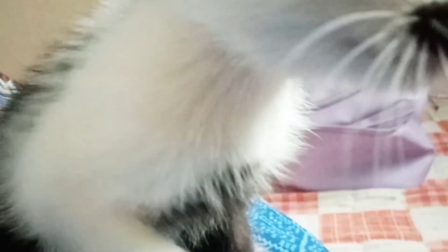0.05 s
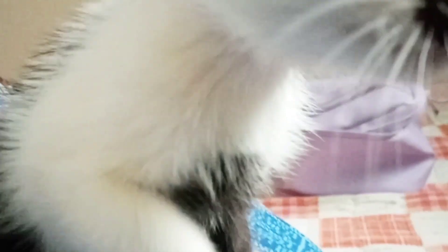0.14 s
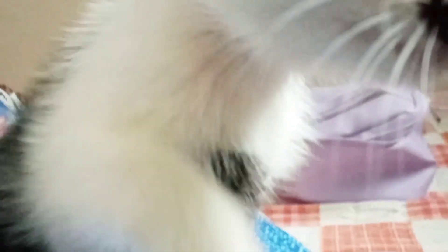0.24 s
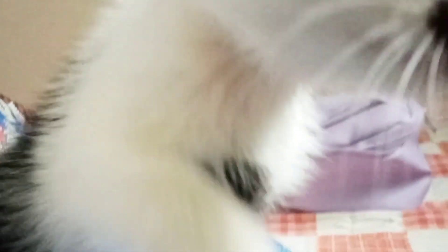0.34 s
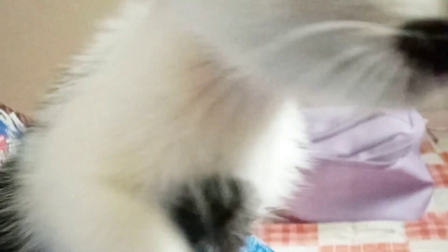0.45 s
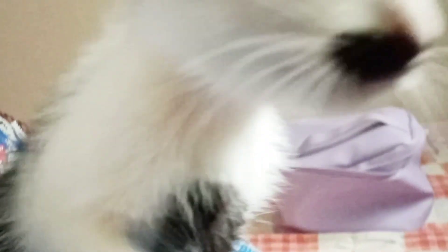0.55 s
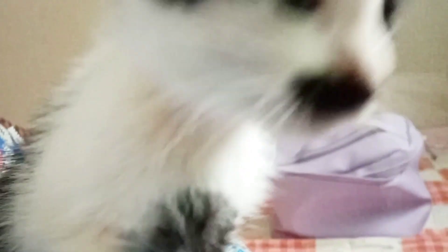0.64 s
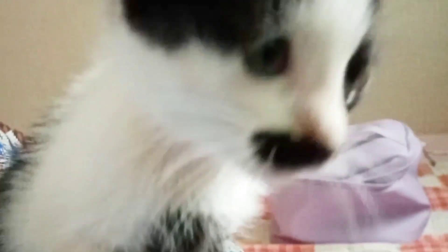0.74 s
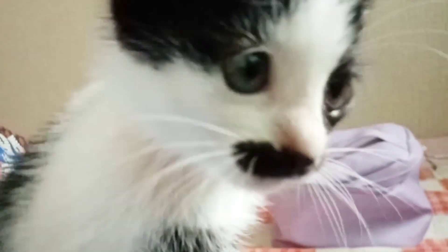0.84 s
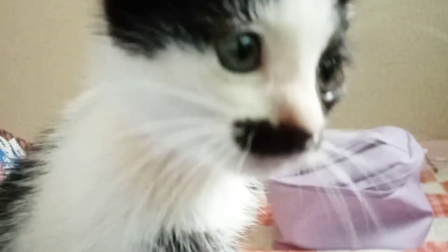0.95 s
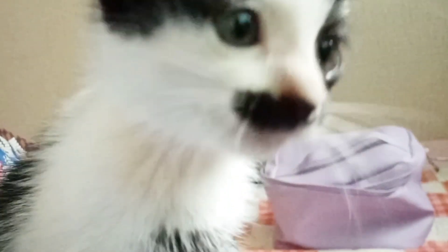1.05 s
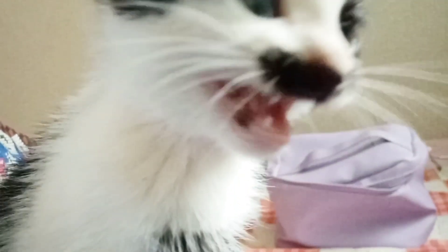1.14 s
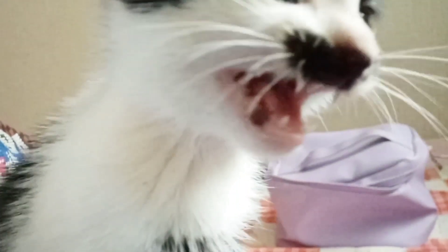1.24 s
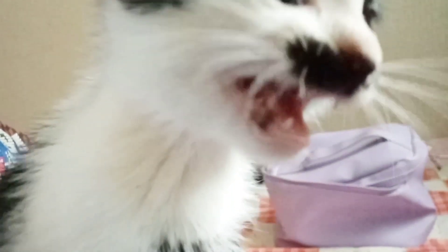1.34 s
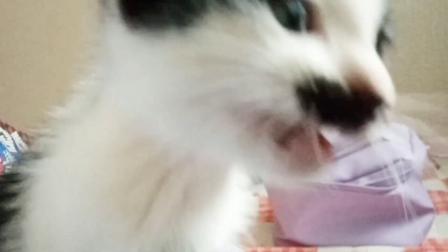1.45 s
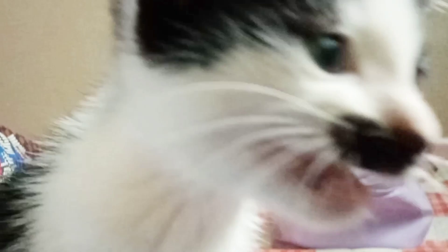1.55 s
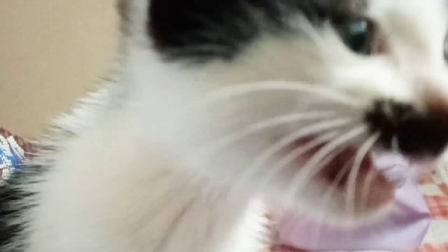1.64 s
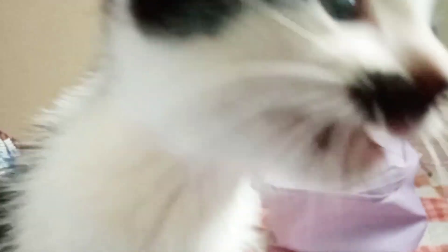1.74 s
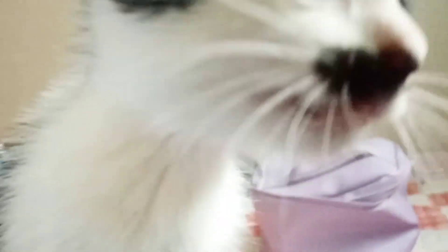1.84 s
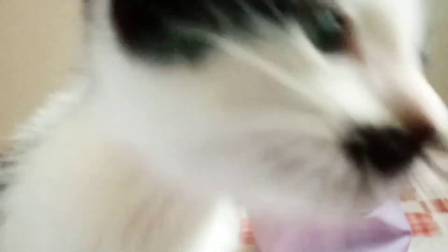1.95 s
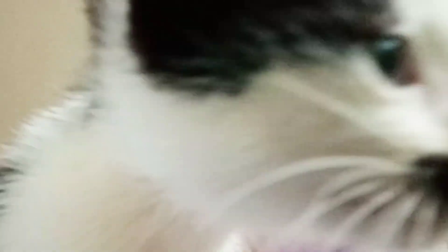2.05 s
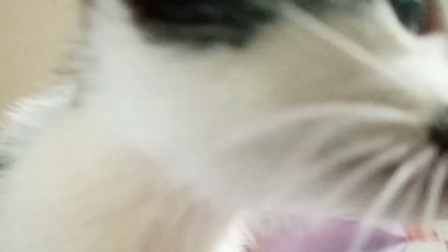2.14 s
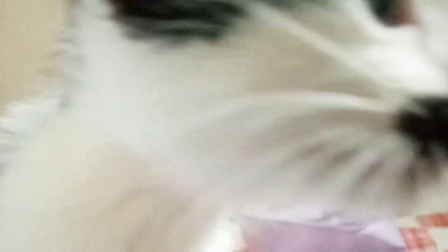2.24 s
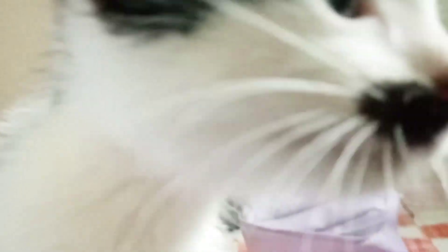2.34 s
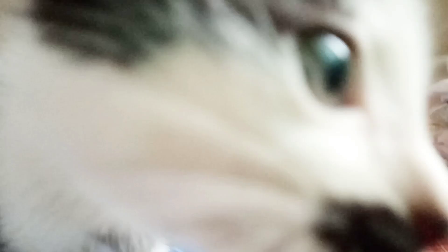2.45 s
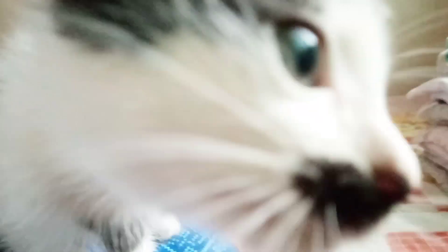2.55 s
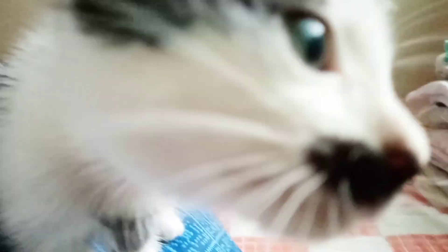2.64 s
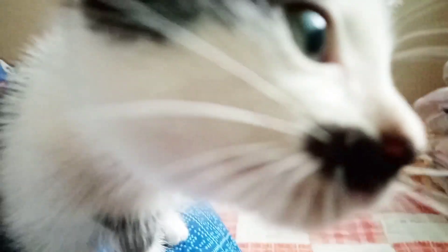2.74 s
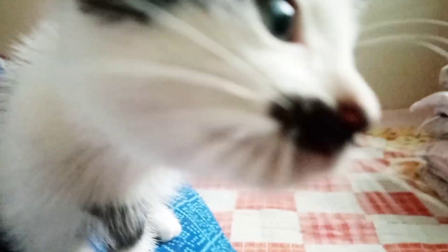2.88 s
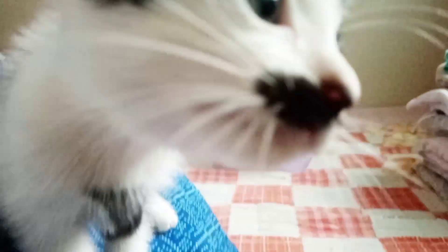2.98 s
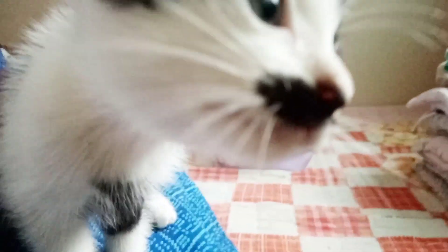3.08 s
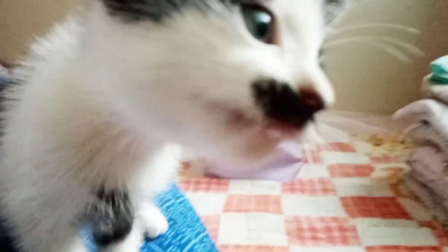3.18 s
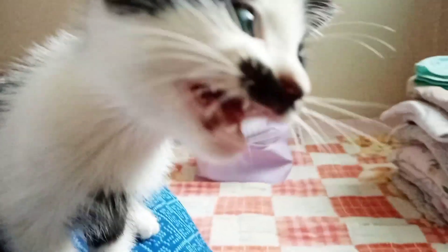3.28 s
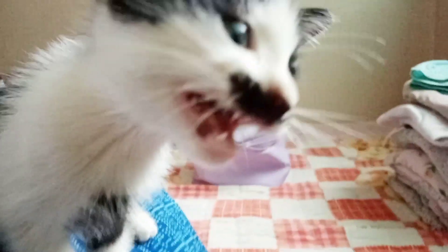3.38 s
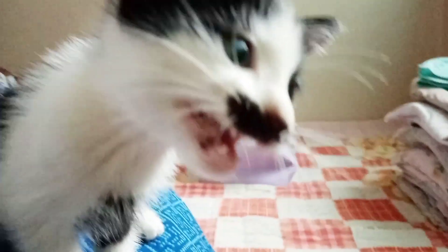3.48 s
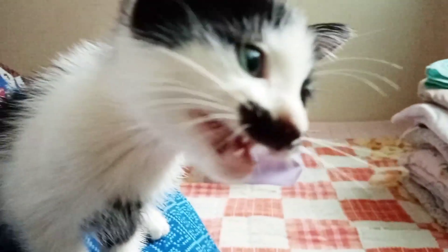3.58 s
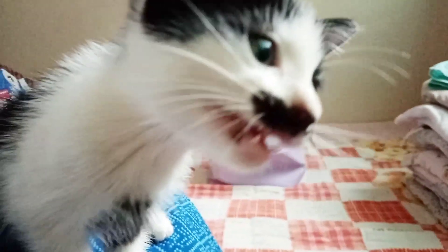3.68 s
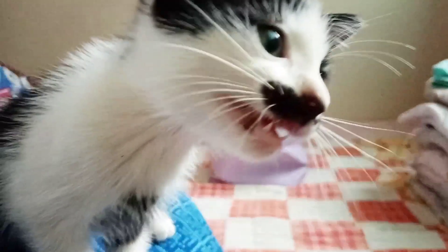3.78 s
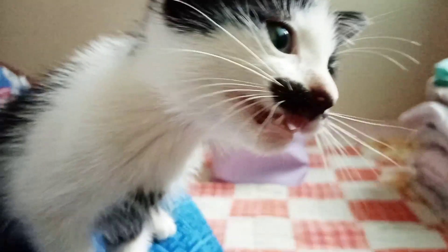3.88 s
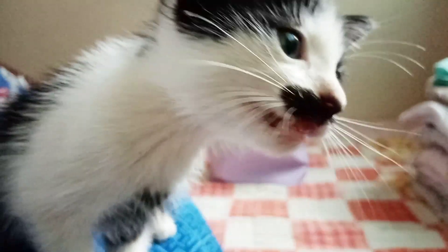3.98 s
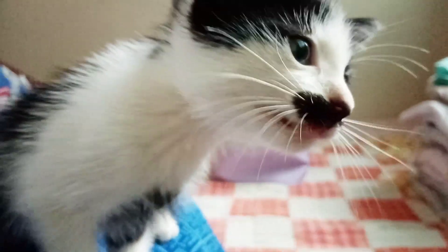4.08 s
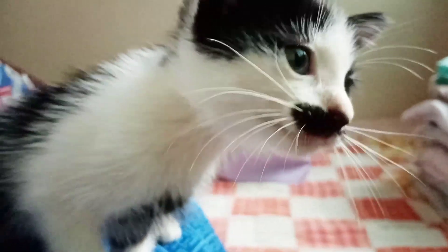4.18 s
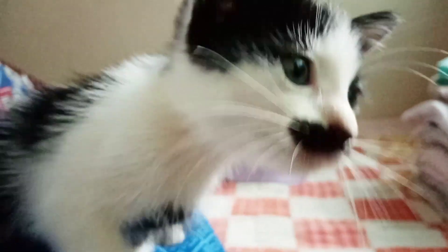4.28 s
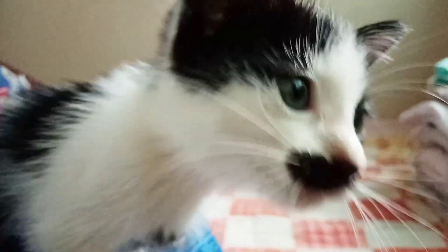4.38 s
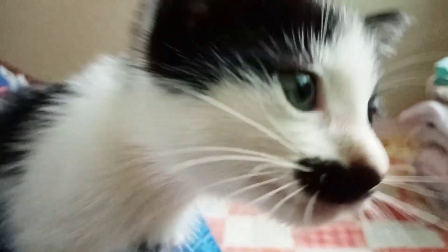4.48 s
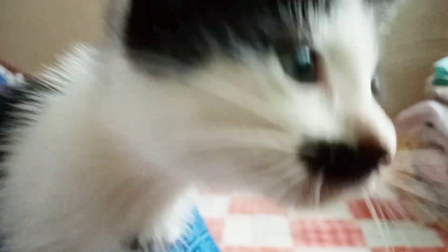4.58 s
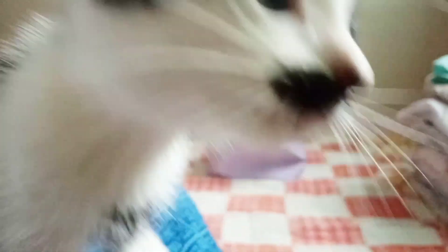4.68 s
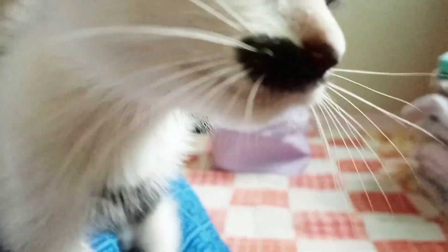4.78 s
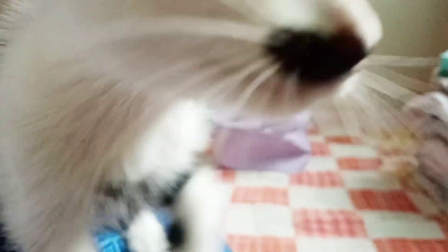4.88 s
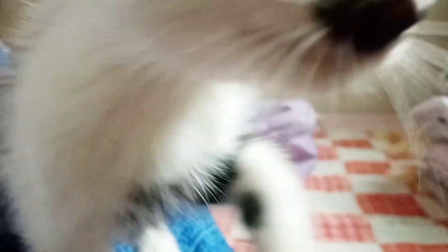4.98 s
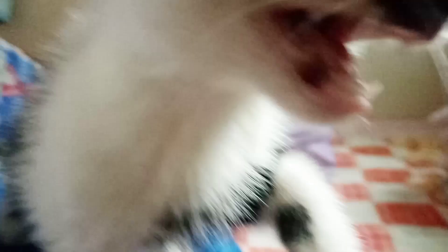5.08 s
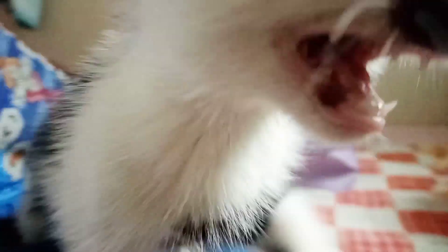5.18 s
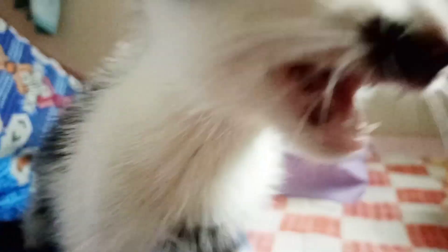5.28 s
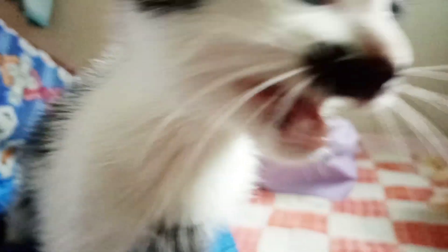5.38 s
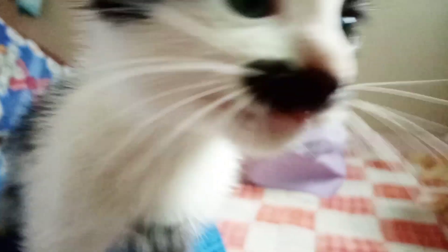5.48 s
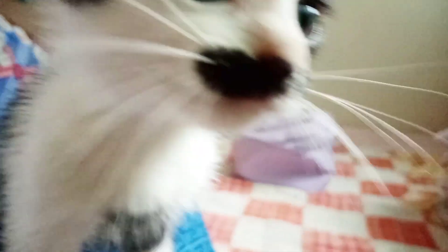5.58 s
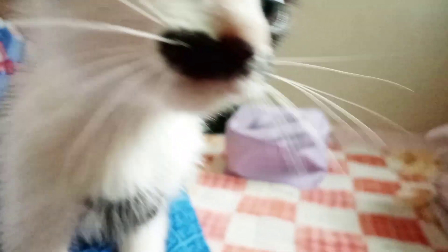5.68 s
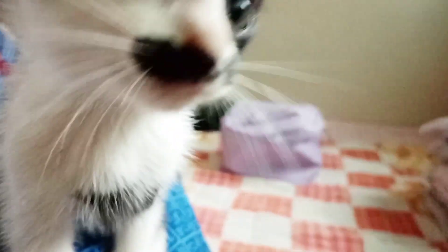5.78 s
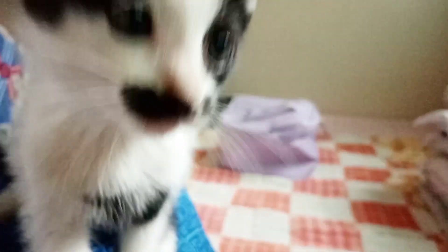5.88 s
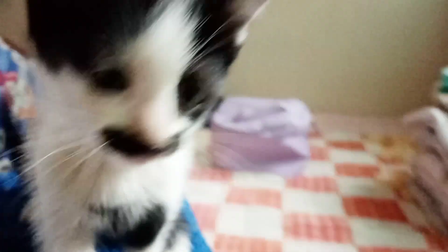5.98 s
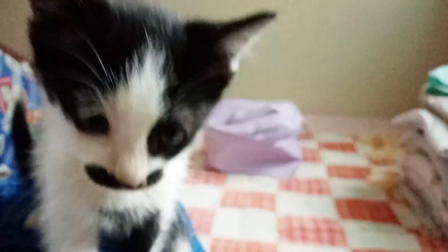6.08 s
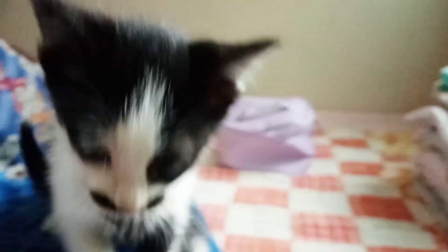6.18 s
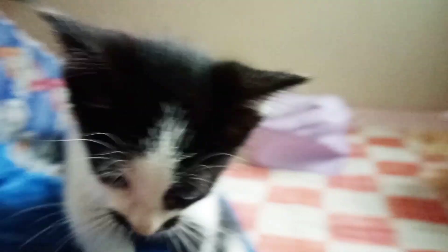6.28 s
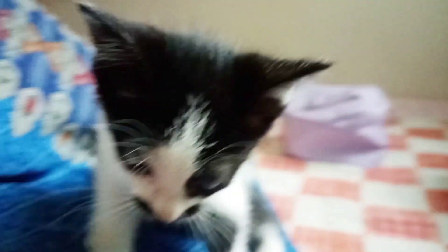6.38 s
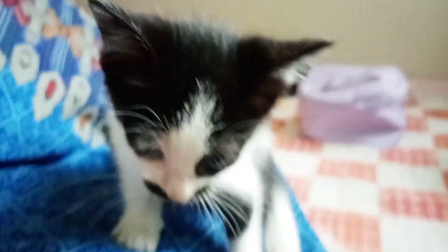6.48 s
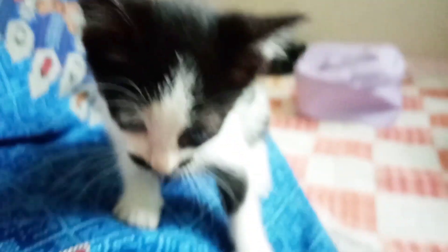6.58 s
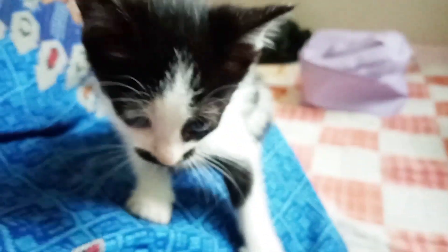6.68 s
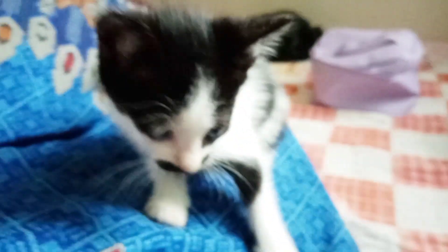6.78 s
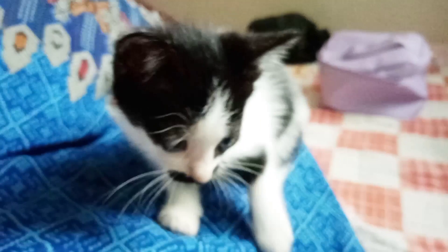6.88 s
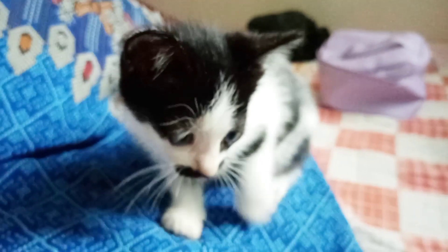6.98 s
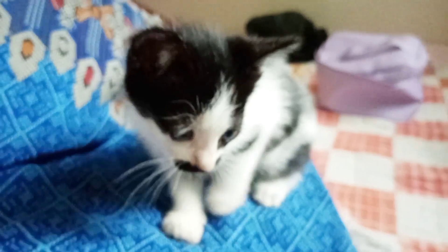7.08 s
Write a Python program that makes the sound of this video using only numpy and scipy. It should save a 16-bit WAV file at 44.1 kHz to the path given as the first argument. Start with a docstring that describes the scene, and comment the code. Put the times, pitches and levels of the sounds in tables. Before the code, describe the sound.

A small quiet room, heard through a close handheld stereo microphone: low fluttering rumble, a faint wavering drone near 117 Hz, room air and thin hiss that swells now and then. At 1.0 s a young kitten meows very close, pitch leaping to around 830 Hz as the mouth opens, bright and nasal, then sagging until 1.9 s and ending in a short puff of hiss. Around 2.4 s come a faint tick and a soft dull bump, with brief swells of hiss to about 3.1 s. The second meow, 3.2 to 4.1 s, is lower, near 700 Hz, smooth, fading gradually to a puff. The third, 5.0 to 5.5 s, is short, rougher and airier, jumping to about 820 Hz and dropping quickly. Reflections are short and soft. From 5.6 to 6.8 s, five faint distant chirps fall near 2.3 kHz, with soft bumps around 6.0 s; room tone continues to about 7.1 s.

```python
"""A low wavering drone (sines), rumble, room air and thin hiss (coloured noise) fill a small quiet room.
From 1 s a kitten meows three times right in front of a hand-held camera: harmonics through a moving throat.
Each cry starts with a short soft noise, leaps up in pitch, sags and ends in a short puff of hiss (noise bursts).
Faint ticks and soft bumps (short noise) come in between; faint falling chirps (swept sines) follow."""
import sys
import numpy as np
from scipy import signal
from scipy.fft import rfft, irfft, next_fast_len
from scipy.io import wavfile
from scipy.ndimage import uniform_filter1d

SR = 44100
rng = np.random.default_rng(int(sys.argv[2]) if len(sys.argv) > 2 else 0)


def wav_record(signal):
    """Record a signal, one row per channel, as 16-bit PCM in the file named by sys.argv[1]."""
    frames = np.transpose(np.atleast_2d(signal))
    bounded = np.clip(frames, -1, 1)
    # unit amplitude maps onto the largest positive 16-bit level
    quanta = np.round(bounded * 32767).astype(np.int16)
    wavfile.write(sys.argv[1], SR, quanta)


N = 314442
TIME = np.arange(N) / SR
EDGE_HZ = 15600  # top of the band


def gain_of(db):
    """Decibels to amplitude."""
    return 10 ** (np.asarray(db) / 20)


def evened(x):
    """Scales to an rms of one."""
    return x / np.sqrt(np.mean(x ** 2) + 1e-20)


def read(points, hz):
    """Reads a table along a log-frequency axis."""
    f, value = np.transpose(points)
    return np.interp(np.log(hz + 1), np.log(f + 1), value)


def add(mix, s, sound):
    """Mixes a two-channel sound in at time s."""
    part = mix[:, max(round(s * SR), 0):][:, :sound.shape[1]]
    part += sound[:, :part.shape[1]]


def wander(size, rate_hz):
    """Random drift of rms one, rolling off above the rate."""
    hz = np.fft.rfftfreq(size, 1 / SR)
    spectrum = rfft(rng.standard_normal(size)) * (hz > 0) / (1 + (hz / rate_hz) ** 2)
    return evened(irfft(spectrum, size))


def bump(hz, centre_hz, half_width_hz):
    """Bell-shaped curve of a resonance."""
    return 1 / (1 + ((hz - centre_hz) / half_width_hz) ** 2)


def shelf(hz, corner_hz, order=8):
    """Rises from zero to one around the corner."""
    return 1 / (1 + (corner_hz / hz) ** order)


# left-right likeness of noise: (frequency [Hz], correlation [-1 to 1])
LIKENESS = [(60, 1), (130, 0.92), (290, 0.83), (640, 0.62), (1410, -0.25), (3100, 0.21), (6820, -0.069),
            (15000, -0.072)]


def noise(size, shape):
    """Two-channel noise with the spectrum shape(hz), alike in the bass and nearly unrelated in the treble."""
    padded = next_fast_len(size)
    hz = np.fft.rfftfreq(padded, 1 / SR)
    a, b = rfft(rng.standard_normal((2, padded)))
    same = np.clip(read(LIKENESS, hz), -1, 1)
    pair = np.array([a, same * a + np.sqrt(1 - same ** 2) * b])
    return evened(irfft(pair * shape(hz), padded)[:, :size])


# rumble before the gains in rumble(): (time [s], bass level [dB], body level [dB])
RUMBLE = [(0, -53.5, -52.5), (.7, -54.5, -50), (1.25, -51, -52.5), (1.65, -47.5, -51.5), (2.4, -49, -58),
          (2.43, -54, -65), (2.65, -51.5, -60), (3.05, -56.5, -61.5), (3.6, -57, -59), (4.0, -54, -61.5),
          (4.4, -54.5, -63.5), (7.13, -56, -64)]
# brief surges: (start [s], length [s], bass lift [dB], body lift [dB])
SURGES = [(3.166, 0.3, 5, 0.5), (4.986, 0.52, 3, 5)]


def rumble_levels():
    """Bass and body levels in dB: a slow drift with brief surges."""
    s, bass, body = np.transpose(RUMBLE)
    bass, body = np.interp(TIME, s, bass), np.interp(TIME, s, body)
    for start, length_s, bass_db, body_db in SURGES:
        surge = uniform_filter1d(1. * (TIME > start) * (TIME < start + length_s), size=4000)
        bass, body = bass + bass_db * surge, body + body_db * surge
    return bass, body


# rumble spectra: (frequency [Hz], relative level [dB])
BASS_COLOUR = [(20, -38), (45, -39), (62, -14.5), (85, -5.5), (108, 9), (124, 1), (141, -2.5), (170, 3),
               (230, -25.5), (400, -14.5), (700, -71)]
BODY_COLOUR = [(20, -44), (35, -26), (55, -3.5), (120, -4), (220, -3), (280, -1.5), (390, -4), (520, -7.5),
               (700, -5.5), (1000, -11), (1470, -25), (2500, -25), (3400, -76)]


def rumble(bass, body, bass_db=0., body_db=4.5):
    """Two bands of low noise; the level of the body flutters."""
    body_flutter_db = 1.25 * wander(next_fast_len(N), 7.8)[:N]
    low = noise(N, lambda hz: gain_of(read(BASS_COLOUR, hz))) * gain_of(bass_db + bass)
    high = noise(N, lambda hz: gain_of(read(BODY_COLOUR, hz)))
    return low + high * gain_of(body_db + body + body_flutter_db)


# sines of the drone before the throb: (frequency [Hz], level [dB])
DRONE = [(58.5, -76), (117.5, -56.5), (350, -71)]


def drone(bass, waver=0.01297):
    """Sines of wavering pitch that throb, and swell with the bass of the rumble."""
    speed = 1 + waver * wander(next_fast_len(N), 2.84)[:N]
    throb_db = 2.0 * wander(next_fast_len(N), 2.2)[:N] + 1.14 * (bass - bass.mean())
    out = np.zeros(N)
    for hz, db in DRONE:
        out += np.sqrt(2) * gain_of(db + throb_db) * np.sin(2 * np.pi * np.cumsum(hz * speed) / SR)
    return out


# room air spectrum: (frequency [Hz], relative level [dB])
AIR_COLOUR = [(290, -4), (500, 1), (594, -26), (769, 2), (851, -14.5), (927, 0.5), (1070, -9), (1240, -1.5),
              (1670, -5.5), (2070, -4.5), (3960, -33.5), (7560, -37), (8720, -49), (10700, -52),
              (15500, -35)]


def room_air(level_db=-60):
    """Steady coloured noise."""
    return gain_of(level_db) * noise(N, lambda hz: gain_of(read(AIR_COLOUR, hz)))


# swells before the gain in hiss(): (time [s], level [dB], rise time [s], time from start to fade [s])
HISS = [(0, -73.5, 0.018, 1), (1.1, -78.5, .2, 1.3), (2.415, -69.5, 0.019, 0.1),
        (2.766, -70.5, 0.053, 0.27), (3.02, -65, 0.015, 0.092), (3.5, -82, .2, 1.5),
        (4.894, -70.5, 0.029, 0.44), (6.855, -77.5, 0.078, 0.14)]
HISS_FLOOR_DB, HISS_FADE_DB_PER_S = -82.5, 49  # floor before the same gain


def hiss_level():
    """Each swell rises, holds and fades back into a steady floor; powers add."""
    power = gain_of(HISS_FLOOR_DB) ** 2
    for s, db, rise_s, length_s in HISS:
        age = TIME - s
        fading_db = db - HISS_FADE_DB_PER_S * np.maximum(age - length_s, 0)
        power = power + (np.clip(age / rise_s, 0, 1) * gain_of(fading_db)) ** 2
    return np.sqrt(power)


# hiss spectrum on the left: (frequency [Hz], relative level [dB])
HISS_COLOUR = [(1760, 2), (3000, -7.5), (3390, -0.5), (4500, -7), (6390, -7), (7590, -5), (8580, 7.5),
               (9800, 3.5), (11300, -9), (13200, -13), (14900, -5), (15500, -6)]
# (frequency [Hz], left minus right [dB])
HISS_BALANCE = [(6000, 5), (8500, 19.5), (10000, 15), (13500, 3)]


def hiss(gain_db=2.5):
    """Thin swelling noise that leans left."""
    def shape(hz):
        return gain_of(read(HISS_COLOUR, hz) - np.outer([0, 1], read(HISS_BALANCE, hz)))
    return noise(N, shape) * gain_of(gain_db) * hiss_level()


def background():
    """Rumble, drone, room air and hiss together."""
    bass, body = rumble_levels()
    return rumble(bass, body) + drone(bass) + room_air() + hiss()


# jaw gapes: (time [s], half length [s], mouth resonance lift [Hz], treble lift [dB], edge lift [dB],
# fundamental loss [dB])
GAPES = [(1.2, 0.099, 495, 5.5, 0, 1.5), (1.615, 0.049, 4, 0.5, 0.5, -2.5),
         (3.346, 0.074, 560, 4.5, 1, -0.5), (3.681, 0.075, 97, 3.5, -3, 0),
         (5.14, 0.065, 1400, 0.5, 1.5, 1)]
ATTACK_S, RELEASE_S, RELEASE_DB = 0.062, 0.03, 7
SHUT_DB, SEALED_DB, SAG_DB_PER_OCTAVE = 19, 6, 13  # treble losses; sealed: further, before the lips part
MOUTH_HZ, MOUTH_SHUT_HZ, MOUTH_SAG_HZ_PER_OCTAVE = 4336, 800, 930
WEAK_BELOW_HZ = 636  # the fundamental thins out at low pitch
HUM_DB = 2  # a shut mouth hums on the fundamental
PUSH_LEAD_S, PUSH_S, PUSH_EDGE_SHARE = 0.08, 0.092, 0.22  # a push just before the fade sharpens the edge


def cry(t, pitch, level_db, attack_db, open_s, hold_s, push_db, fade_db_per_s, fundamental_db, weak_db,
        bright_db, edge_db, dull_db_per_s, notch_db, notch_octaves):
    """Effort and jaw through one cry; the jaw and the sag of the pitch set the colour of the voice."""
    age = t - t[0]
    effort = level_db - attack_db * np.maximum(1 - age / ATTACK_S, 0)
    effort = effort - fade_db_per_s * np.maximum(age - hold_s, 0)
    effort = effort - RELEASE_DB * np.maximum(1 - (t[-1] - t) / RELEASE_S, 0)
    push = push_db * np.exp(-((age - hold_s + PUSH_LEAD_S) / PUSH_S) ** 2)

    shut = np.cos(np.pi / 2 * np.minimum(age / open_s, 1)) ** 2
    gape_hz, gape_bright, gape_edge, gape_thin = sum(
        np.outer(lifts, np.exp(-((t - s) / half_s) ** 2)) for s, half_s, *lifts in GAPES)
    sag = np.log2(pitch.max() / pitch)

    weak = weak_db * (1 - shelf(pitch, WEAK_BELOW_HZ, order=24)) * (1 - shut)
    fundamental = fundamental_db - weak + HUM_DB * shut - gape_thin
    bright = bright_db - SHUT_DB * shut - SEALED_DB * shut ** 4 + gape_bright - SAG_DB_PER_OCTAVE * sag
    mouth = MOUTH_HZ - MOUTH_SHUT_HZ * shut + gape_hz - MOUTH_SAG_HZ_PER_OCTAVE * sag
    edge = edge_db - dull_db_per_s * age + PUSH_EDGE_SHARE * push + gape_edge
    notch = notch_db * np.exp(-(sag / notch_octaves) ** 2)
    return effort + push, fundamental, bright, edge, mouth, shut, notch


NOTCH_HZ, NOTCH_HALF_WIDTH_HZ = 3300, 330


def voice_notch(hz, depth_db):
    """A dip in the voice near 3.3 kHz, deepest at top pitch; returns dB."""
    return depth_db * bump(hz, NOTCH_HZ, NOTCH_HALF_WIDTH_HZ)


# throat resonances that ring on after each pulse: (centre [Hz], half width [Hz])
RINGS = [(1400, 160), (6500, 590), (10500, 840)]
# nasal hum behind shut lips, resonance then dip: (centre [Hz], half width [Hz], lift [dB])
NOSE = [(1090, 150, 7), (1670, 530, -13)]


def harmonics(phase, pitch, state, throat, balance, lead, flutter_db, mouth_db, mouth_width_hz, drift_rad):
    """Harmonics of the vocal folds, each weighted by throat, nose and mouth and delayed by resonances."""
    effort, fundamental, bright, edge, mouth, shut, notch = state
    size = len(pitch)
    sides, voice = np.array([[.5], [-.5]]), np.zeros((2, size))
    for k in range(1, int(EDGE_HZ / pitch.min())):
        hz = k * pitch
        flutter, sway = shelf(hz, 2000) * np.array([wander(size, 28), wander(size, 14)])
        db = effort + read(throat, hz) + fundamental * (k == 1)
        db = db + bright * shelf(hz, 2600) + edge * shelf(hz, 8000)
        db = db + mouth_db * bump(hz, mouth, mouth_width_hz) + flutter_db * flutter
        db = db + voice_notch(hz, notch)
        db = db + shut * sum(lift_db * bump(hz, centre, width) for centre, width, lift_db in NOSE)
        # resonances delay nearby harmonics, so every pulse rings on
        resonances = [*RINGS, (mouth, mouth_width_hz)]
        lag = sum(2 * np.arctan((hz - centre) / width) for centre, width in resonances)
        # the moving head shifts the upper harmonics between the ports
        apart = read(lead, hz) + drift_rad * sway
        gain = np.sqrt(2) * (hz < EDGE_HZ) * gain_of(db + sides * read(balance, hz))
        voice += gain * np.cos(k * phase - lag + sides * apart)
    return voice


AIR_EDGE_DB = 5.5  # extra escaping air above 7.5 kHz
THROAT_AIR_HZ, THROAT_AIR_HALF_WIDTH_HZ = 1720, 600


def breath(phase, slack, state, throat, balance, air_db, throat_air_db, mouth_air_db):
    """Escaping, throat and hoarse mouth air, all pulsed as the folds open; more when they are slack."""
    effort, _, bright, _, mouth, _, notch = state
    size, sides = len(phase), np.array([[.5], [-.5]])

    def air_shape(hz):
        db = .5 * read(throat, hz) + voice_notch(hz, notch.mean()) + sides * read(balance, hz)
        return gain_of(db) * shelf(hz + 1, 3900) * gain_of(AIR_EDGE_DB * shelf(hz + 1, 7500))

    def rush_shape(hz):
        return bump(hz, THROAT_AIR_HZ, THROAT_AIR_HALF_WIDTH_HZ) * (1 - shelf(hz + 1, 2640, order=16))

    air = noise(size, air_shape) * gain_of(air_db + effort + .5 * bright + 7 * slack)
    rush = noise(size, rush_shape) * gain_of(throat_air_db + effort + 5 * slack)
    # a noise band carried 700 Hz above the mouth resonance
    carrier = np.cos(2 * np.pi * np.cumsum(mouth + 700) / SR)
    hoarse = noise(size, lambda hz: 1 - shelf(hz + 1, 1100, order=4)) * carrier
    hoarse = hoarse * gain_of(mouth_air_db + effort + bright + 4 * slack)
    return (air + rush + hoarse) * (1 + np.cos(phase))


SPLIT_HZ = 655  # below this, pulses alternate early and late, adding half lines


def meow(contour, row, throat, balance, lead, air_db, throat_air_db, mouth_air_db, rough, split_rad,
         flutter_db=1.5, mouth_db=10, mouth_width_hz=600, drift_rad=0.66):
    """Vocal folds drive the throat and a moving mouth resonance; slack folds beat less evenly."""
    s, contour_hz = np.transpose(contour)
    t = np.arange(s[0], s[-1], 1 / SR)
    size = len(t)
    pitch = uniform_filter1d(np.interp(t, s, contour_hz), size=700)
    effort, *colour = cry(t, pitch, *row)
    # glassy while the folds are taut, rough as the pitch sinks
    slack = 1 - shelf(pitch, 570, order=24)
    jitter = rough * wander(size, 220) + .003 * wander(size, 12) + .014 * slack * wander(size, 250)
    shimmer_db = (.5 + 1.7 * slack) * wander(size, 60)
    pitch = pitch * (1 + jitter)
    phase = 2 * np.pi * np.cumsum(pitch) / SR
    phase = phase + split_rad * (1 - shelf(pitch, SPLIT_HZ, order=40)) * np.sin(phase / 2)
    state = (effort + shimmer_db, *colour)
    voice = harmonics(phase, pitch, state, throat, balance, lead,
                      flutter_db, mouth_db, mouth_width_hz, drift_rad)
    voice += breath(phase, slack, state, throat, balance, air_db, throat_air_db, mouth_air_db)
    return s[0], voice * signal.windows.tukey(size, .03)


# pitch of each meow: (time [s], pitch [Hz])
PITCH_1 = [(1.034, 625), (1.046, 565), (1.057, 490), (1.08, 586), (1.102, 742), (1.142, 832.6),
           (1.21, 837.3), (1.384, 764.4), (1.4, 738), (1.5, 705), (1.604, 734.7), (1.704, 707.4),
           (1.74, 680), (1.776, 638), (1.802, 633), (1.86, 532), (1.885, 482)]
PITCH_2 = [(3.195, 394), (3.207, 418), (3.225, 540), (3.24, 600), (3.254, 701), (3.29, 723), (3.418, 684.2),
           (3.508, 700.3), (3.778, 644.3), (3.954, 611), (4.038, 595.4), (4.092, 519), (4.12, 552)]
PITCH_3 = [(5.012, 409), (5.028, 440), (5.043, 575), (5.056, 763), (5.075, 780), (5.104, 822), (5.166, 787),
           (5.2, 750.6), (5.334, 719), (5.392, 657.5), (5.426, 600), (5.46, 555), (5.476, 451),
           (5.49, 375.5)]
# throat colour of each meow: (frequency [Hz], relative level [dB])
THROAT_1 = [(600.0, -2.5), (1000.0, -2.5), (1450.0, 0), (1680, -3), (2100.0, -11), (2900.0, -14.5),
            (3600.0, -9), (4400.0, -11.5), (5000, -11), (5500.0, -10.5), (6500.0, -0.5), (7600.0, -12.5),
            (9000.0, -4.5), (11000.0, 2.5), (13500.0, -13), (15500.0, -15)]
THROAT_2 = [(600.0, -7.5), (1000.0, -6), (1450.0, 0), (1650, -2), (2100.0, -17), (2900.0, -20.5),
            (3600.0, -17.5), (4400.0, -22), (5300.0, -23), (6500.0, -12), (7600.0, -18), (9000.0, -21),
            (11000.0, -15.5), (13500.0, -20), (15500.0, -35)]
THROAT_3 = [(600, -12), (1000, -6.5), (1450, -1), (1750, -8.5), (2200, -22), (2450, -10.5), (2900, -24),
            (3500, -11), (4400, -5.5), (5300, -12), (6500, -7.5), (7600, -12), (9000, -12), (11000, -16.5),
            (15500, -21)]
# the head is at a new place for each meow: (frequency [Hz], left minus right [dB])
BALANCE_1 = [(700.0, 0.5), (1400.0, -5.5), (2200.0, -8.5), (3250, 2.5), (3600.0, 7), (5000.0, -4.5),
             (6500.0, -8), (8200.0, 15), (10000.0, 5), (12000.0, -3), (15000.0, 6)]
BALANCE_2 = [(700.0, 4.5), (1400.0, 0), (2000.0, -8.5), (3600.0, 5.5), (4300, -5), (5000.0, -11),
             (6500.0, -14.5), (8000.0, 9), (10000.0, 0), (12000.0, -5), (13000, 3), (15000.0, -1)]
BALANCE_3 = [(700.0, 3.5), (1400.0, -2), (2200.0, -2), (3600.0, 4), (4500, -7), (5100.0, -10.5),
             (5800, -14.5), (6500.0, -18), (8200.0, 6), (10000.0, 0), (12000.0, 2), (15000.0, -3)]
# so the two microphone ports hear it out of step: (frequency [Hz], left lead [rad])
LEAD_1 = [(700, -0.5), (1460, 0.36), (2100, 1.5), (2840, 3), (3620, 2), (4390, 1), (5000, 1.65), (5400, 3),
          (6290, 1.5), (6720, 5.5), (7920, 8), (9130, 16), (10200, 9), (13300, 13.5), (14300, 15),
          (15300, 10)]
LEAD_2 = [(700, -1.2), (1400, 1), (2150, 2), (3620, 2), (3960, 2.9), (4480, -2.5), (6200, 1), (6630, 0),
          (7240, 3.5), (8500, 1.5), (10500, 0.9), (11500, 2), (13000, 1.4), (14500, 3), (15300, 0)]
LEAD_3 = [(750, -1), (1350, 0.9), (1500, -0.4), (1650, 2), (2000, -2), (2410, -2.5), (3700, -2),
          (5860, -4.5), (6290, 1), (7750, 2.5), (8870, 5), (11200, 1), (12800, 10), (13200, 0), (15300, 7)]
# one row a meow: (level [dB], attack swell [dB], jaw opening time [s], time at full effort [s],
# last push [dB], fade after that [dB/s], extra on the fundamental [dB], its loss at low pitch [dB],
# brightness above 2.6 kHz [dB], edge above 8 kHz [dB], dulling of that edge [dB/s],
# notch near 3.3 kHz at top pitch [dB], sag of pitch that fills it [octaves])
MEOWS = [(-46, 9.5, 0.15, 0.74, 3, 30, 0.5, 6, -3.5, -11.5, 1.5, -6.5, 0.4),
         (-45.5, 15, 0.052, 0.45, 1.4, 12.5, 5, 10, 0.8, -10.5, -2, -11, 0.12),
         (-43.5, 10, 0.075, 0.37, 1, 78, 7, 6.5, -3.5, 4, 19, -1, 0.27)]
# one value a meow, air relative to the effort before slack and brightness: (level [dB])
AIR_DB = (-26, -27.5, -14.5)
THROAT_AIR_DB = (-25, -25, -19)
MOUTH_AIR_DB = (-27, -29, -13)
# one value a meow: fast pitch jitter (rms [share of pitch]); pulse alternation (depth [rad])
ROUGHNESS = (.0015, .0013, .0033)
SPLIT_RAD = (.035, .015, .075)


def meows(mix):
    """Three cries, each with its own pitch, throat and head position."""
    contours = [PITCH_1, PITCH_2, PITCH_3]
    throats = [THROAT_1, THROAT_2, THROAT_3]
    balances = [BALANCE_1, BALANCE_2, BALANCE_3]
    leads = [LEAD_1, LEAD_2, LEAD_3]
    for settings in zip(contours, MEOWS, throats, balances, leads,
                        AIR_DB, THROAT_AIR_DB, MOUTH_AIR_DB, ROUGHNESS, SPLIT_RAD):
        add(mix, *meow(*settings))


# skirt spectrum of every burst: (frequency [Hz], relative level [dB])
SKIRT_COLOUR = [(500, -32), (1500, 1), (2900, -3), (4200, -2.5), (6500, -2), (7700, -4), (10500, 2),
                (13500, 2), (15500, 8)]


def burst(s, db, half_s, centre_hz, half_width_hz, skirt_db):
    """A short, uneven rush of noise through one resonance, with a broad skirt."""
    t = np.arange(-SR // 15, SR // 15) / SR

    def shape(hz):
        return bump(hz, centre_hz, half_width_hz) + gain_of(skirt_db + read(SKIRT_COLOUR, hz))

    uneven_db = 5.7 * wander(len(t), 160)
    return s + t[0], gain_of(db + uneven_db) * noise(len(t), shape) * np.exp(-.5 * (t / half_s) ** 2)


# (time [s], level [dB], half length [s])
ONSET_NOISE = [(1.05, -58.5, 0.009), (3.193, -55, 0.019), (5.028, -55, 0.012)]


def onset_noise(mix):
    """A short soft noise around 1.2 kHz at the start of each cry."""
    for s, db, half_s in ONSET_NOISE:
        add(mix, *burst(s, db, half_s, centre_hz=1210, half_width_hz=670, skirt_db=-54))


CLICK_SKIRT_DB = -9
# (time [s], level [dB], centre [Hz], half width [Hz])
CLICKS = [(1.085, -54, 6500, 3000), (1.871, -55, 4460, 3000), (4.1192, -44, 15300, 894)]


def mouth_clicks(mix):
    """Very short noise bursts."""
    for s, db, centre_hz, half_width_hz in CLICKS:
        add(mix, *burst(s, db, 0.00083, centre_hz, half_width_hz, CLICK_SKIRT_DB))


# (time [s], level [dB], centre [Hz])
SQUEAKS = [(1.319, -56, 8840), (1.386, -69, 9500), (1.706, -68, 9640), (3.435, -77, 8500),
           (3.555, -78, 9200)]


def squeaks(mix):
    """Thin narrow-band bursts within the cries."""
    for s, db, centre_hz in SQUEAKS:
        add(mix, *burst(s, db, 0.017, centre_hz, half_width_hz=420, skirt_db=-31))


# (time [s], level [dB], half length [s], centre [Hz], broad skirt [dB], throat level [dB],
# closing-mouth resonance [Hz], its level [dB])
PUFFS = [(1.88, -46.5, 0.011, 10850, -12, -51.5, 4480, -57.5),
         (4.119, -48.5, 0.012, 15300, -7, -55, 5260, -65),
         (5.493, -49.5, 0.0065, 14430, 15, -64, 5590, -59)]
PUFF_HALF_WIDTH_HZ, THROAT_SKIRT_DB = 910, -35


def puffs(mix):
    """As each voice gives out, air hisses through treble, closing mouth and throat."""
    for s, db, half_s, centre_hz, skirt_db, throat_db, lips_hz, lips_db in PUFFS:
        add(mix, *burst(s, lips_db, half_s, lips_hz, PUFF_HALF_WIDTH_HZ, THROAT_SKIRT_DB))
        add(mix, *burst(s, db, half_s, centre_hz, PUFF_HALF_WIDTH_HZ, skirt_db))
        add(mix, *burst(s, throat_db, half_s, 1430, 700, THROAT_SKIRT_DB))


def kitten():
    """Three cries with their onset noise, clicks, squeaks and closing puffs."""
    out = np.zeros((2, N))
    meows(out)
    onset_noise(out)
    mouth_clicks(out)
    squeaks(out)
    puffs(out)
    return out


def room(x, t60=.25, treble_t60=.125, wet_db=-13):
    """Sparse reflections from the bed and the near walls; cloth soaks up the treble first."""
    t = np.arange(SR // 3) / SR
    sparse = rng.random((2, len(t))) < 2500 / SR  # 2500 reflections per second
    taps = rng.standard_normal((2, len(t))) * sparse * (t > .002)
    low = signal.sosfiltfilt(signal.butter(2, 2500, fs=SR, output="sos"), taps)
    tail = low * gain_of(-60 * t / t60) + (taps - low) * gain_of(-60 * t / treble_t60)
    tail /= np.linalg.norm(tail, axis=1, keepdims=True)
    return x + gain_of(wet_db) * signal.fftconvolve(x, tail, axes=1)[:, :N]


# (time [s], level [dB])
TICKS = [(2.421, -63), (4.92, -73), (6.03, -70)]


def faint_ticks(mix):
    """Faint broad ticks: very short noise bursts."""
    for s, db in TICKS:
        add(mix, *burst(s, db, 0.0016, 5000, 5000, CLICK_SKIRT_DB))


# bumps on the bedding: (time [s], level before decay [dB], centre [Hz], half width [Hz], decay time [s])
BUMPS = [(2.454, -48, 450, 220, 0.01), (5.957, -52.5, 1310, 420, 0.056), (5.968, -55.5, 800, 200, 0.08),
         (6.035, -59, 820, 260, 0.054)]


def soft_bumps(mix):
    """Dull resonant noise with a quick onset and exponential decay."""
    t = np.arange(SR // 4) / SR
    for s, db, centre_hz, half_width_hz, decay_s in BUMPS:
        def shape(hz):
            return bump(hz, centre_hz, half_width_hz) * (1 - shelf(hz + 1, 2800))
        scrape_db = 2.0 * wander(len(t), 80)
        envelope = np.exp(-t / decay_s) * np.tanh(t / 0.0015) ** 2
        add(mix, s, gain_of(db + scrape_db) * noise(len(t), shape) * envelope)


# (time [s], level of half the peak amplitude [dB], starting pitch before blur [Hz])
CHIRPS = [(5.63, -66.5, 2550), (5.91, -65, 2265), (6.15, -66.5, 2400), (6.41, -63, 2355), (6.73, -65, 2285)]


def chirps(mix, chirp_s=0.1, fall=0.15, blur=0.047):
    """Far, falling sines, their pitch blurred separately on each side (shares of the pitch)."""
    t = np.arange(SR // 4) / SR
    for s, db, hz in CHIRPS:
        u = np.minimum(t / chirp_s, 1)
        blurring = np.array([wander(len(t), 240) for side in range(2)])
        pitch = hz * (1 - fall * u + blur * blurring)
        tone = np.sin(2 * np.pi * np.cumsum(pitch, axis=1) / SR)
        add(mix, s, 2 * gain_of(db) * np.sin(np.pi * u) * tone)


def small_sounds():
    """Ticks, bumps and chirps, without reflections."""
    out = np.zeros((2, N))
    faint_ticks(out)
    soft_bumps(out)
    chirps(out)
    return out


def scene():
    """The room's background, the kitten close by and the small sounds."""
    return background() + room(kitten()) + small_sounds()


def record(dry):
    """Band limit: linear-phase low-pass at the top edge."""
    lowpass = signal.firwin(801, EDGE_HZ, window=("kaiser", 9), fs=SR)
    return signal.oaconvolve(dry, lowpass[None], "same")


dry = scene()
out = record(dry)
wav_record(out)
```